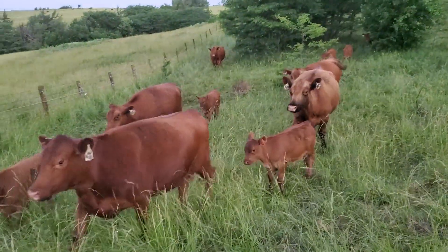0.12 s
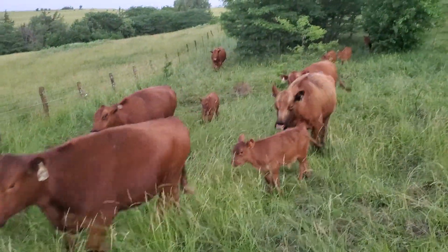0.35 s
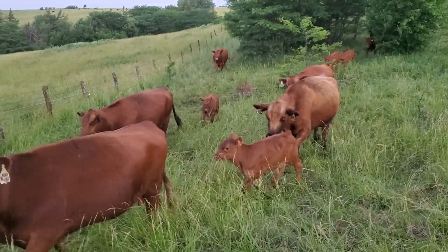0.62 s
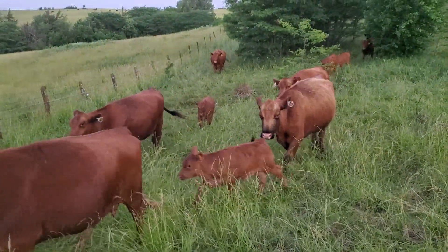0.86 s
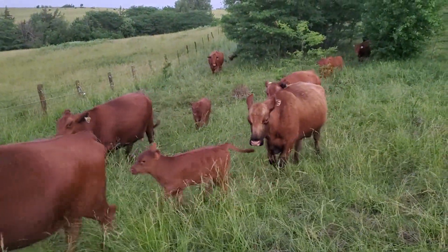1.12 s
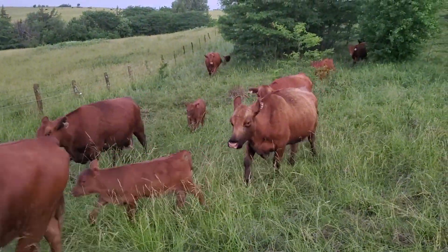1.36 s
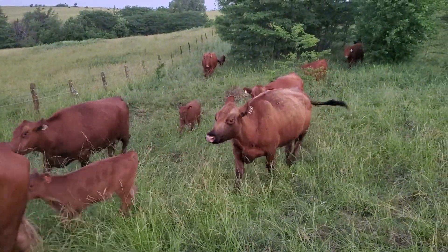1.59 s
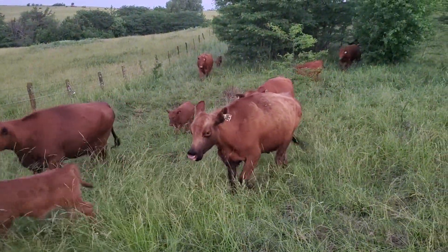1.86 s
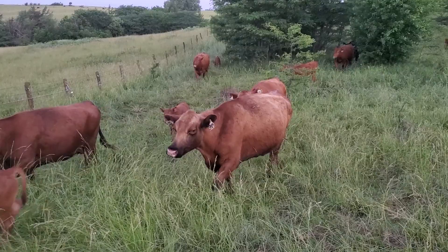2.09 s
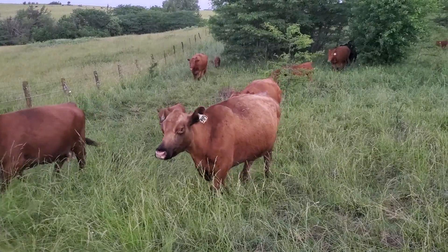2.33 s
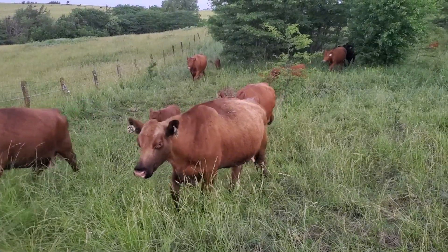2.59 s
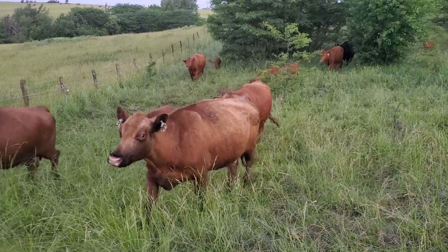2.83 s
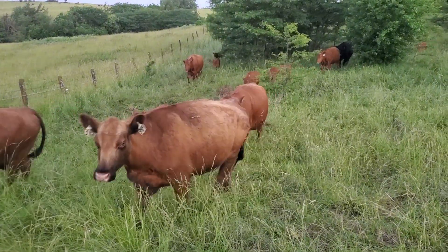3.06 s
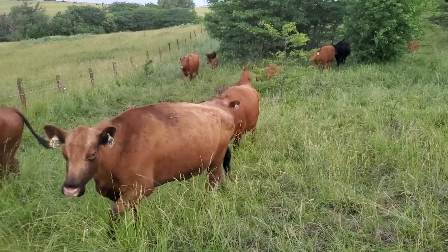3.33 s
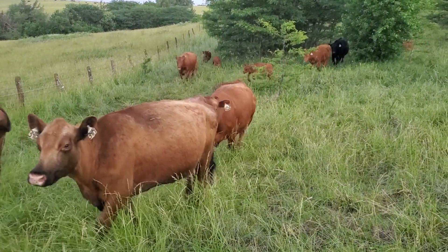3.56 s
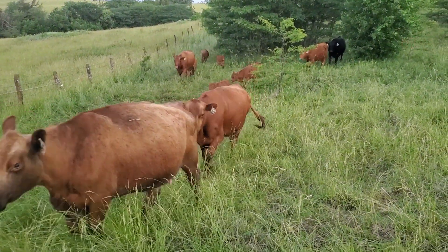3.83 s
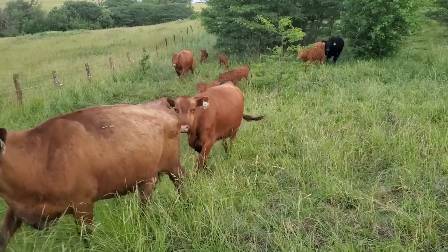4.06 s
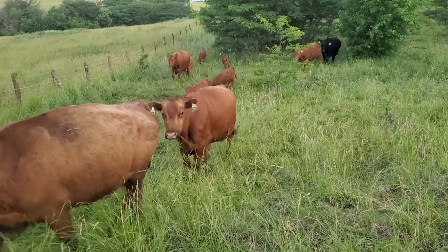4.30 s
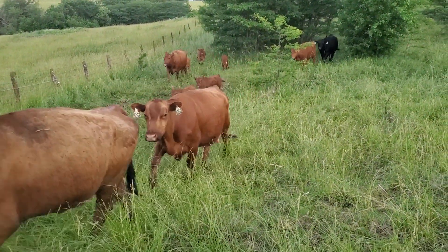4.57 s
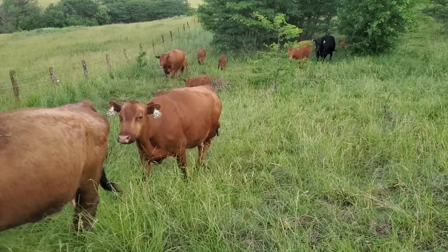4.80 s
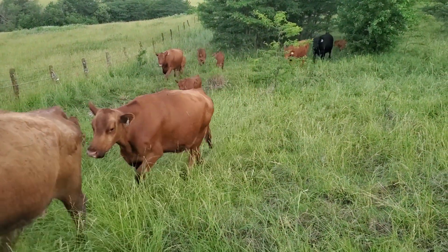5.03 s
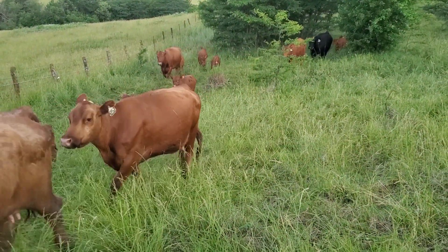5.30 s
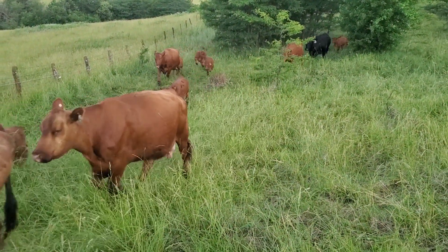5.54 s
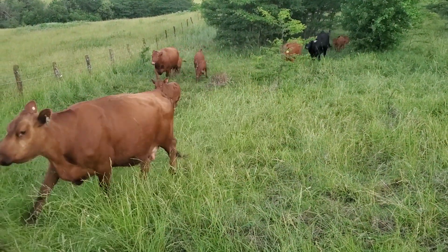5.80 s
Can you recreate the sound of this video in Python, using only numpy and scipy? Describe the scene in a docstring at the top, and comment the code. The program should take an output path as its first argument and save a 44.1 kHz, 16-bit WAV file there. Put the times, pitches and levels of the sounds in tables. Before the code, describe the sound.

A faint low grunt opens the scene over brushing grass and regular little bird chirps. One cow's moo swells from a nasal murmur to a strong, resonant call mid-scene, then cuts off quickly with a slight outdoor echo. Another muted grunt overlaps its end. Legs keep sweeping through grass, with sharp stem snaps, soft footfalls and a last tiny grunt. Handheld stereo pickup, open field, gentle wind buffeting.

```python
"""Cow mooing in a pasture

A cow walking through tall grass moos once: harmonics through a vocal tract, a closed-mouth hum that rises
in pitch and opens into a bright call. Others grunt softly in a few low overtones. Shaped noise makes the
swish of the herd's legs in the grass and the light breeze rumbling in the two microphone ports. Hooves thud
as damped sines, stems snap as short rings with crumble, and small birds in the hedge chirp as sliding sines."""
import sys
import numpy as np
from scipy import signal
from scipy.fft import irfft
from scipy.io import wavfile
from scipy.ndimage import uniform_filter1d

SR = 44100
rng = np.random.default_rng(int(sys.argv[2]) if len(sys.argv) > 2 else 0)


def store_wav(level_fs):
    """Save 16-bit WAV to argv[1]."""
    pcm = np.round(np.clip(np.atleast_2d(level_fs), -1, 1) * 32767)
    wavfile.write(sys.argv[1], SR, pcm.T.astype(np.int16))


def ratio(d):
    """dB to gain"""
    e = np.asarray(d, float) / 20
    return 10 ** e


N = 260631


def evened(x):
    """Scales to rms 1."""
    return x / np.sqrt(np.mean(x ** 2) + 1e-20)


def read(points, hz):
    """Reads a spectrum on a log-frequency axis."""
    f, value = np.transpose(points)
    return np.interp(np.log(hz + 1), np.log(f + 1), value)


def add(mix, start_s, sound, pan_db=0):
    """Places a sound between the two channels; positive pan leans left."""
    part = mix[:, round(start_s * SR):][:, :len(sound)]
    part += ratio(np.array([[pan_db / 2], [-pan_db / 2]])) * sound[:part.shape[1]]


def noise(spectrum, s, db, size, same, lead_s, lean_db, patchy_db, flicker_db):
    """Random short-time spectra with drifting patches and wide flicker; the left port may hear it first."""
    hop = size // 4
    frames, hz = N // hop + 5, np.fft.rfftfreq(size, 1 / SR)
    a, b, c, d, patches = rng.standard_normal((frames, len(hz), 5)).T
    patches = uniform_filter1d(patches, size=len(hz) // 20 + 1, axis=0)
    patches = evened(uniform_filter1d(patches, size=5, axis=1))
    flicker = evened(uniform_filter1d(rng.standard_normal(frames), size=3))

    same = np.clip(same, -1, 1)  # correlation between the ports
    left = a + 1j * b
    delay = np.exp(-2j * np.pi * hz[:, None] * lead_s)
    right = same * left * delay + np.sqrt(1 - same ** 2) * (c + 1j * d)
    lean = ratio(lean_db * np.sqrt(hz / hz[-1]))[:, None]  # the ports differ most in the treble

    level_db = read(spectrum, hz)[:, None] + patchy_db * patches + flicker_db * flicker
    z = np.array([left * lean, right / lean]) * ratio(level_db)
    wave = signal.istft(z, nperseg=size, noverlap=size - hop)[1][:, :N]
    return evened(wave) * ratio(np.interp(np.arange(N) / SR, s, db))


# The swell, then the release. Each row: time in seconds, pitch in Hz, nose hum in dB, mouth call in dB.
MOO_COURSE = [(1.76, 73.58, -69, -62.5), (1.86, 75.43, -65, -74), (1.995, 81.3, -62.5, -83),
              (2.068, 92, -49.5, -64), (2.176, 104.7, -50, -56), (2.296, 131.9, -51, -46.5),
              (2.358, 141.3, -41.5, -44), (2.412, 149.6, -50.5, -44.5), (2.478, 158.8, -37, -40.5),
              (2.598, 168.2, -31.5, -36), (2.83, 175.6, -28, -37.5), (3.012, 176.2, -28.5, -36),
              (3.139, 173.9, -29, -35), (3.172, 154, -31, -34), (3.21, 130, -64, -66)]
# Throat and mouth, with the dips of the nasal side branch.
# Each row: frequency in Hz, gain half-open in dB, gain wide-open in dB.
VOCAL_TRACT = [(50, -23, -4), (178, 2, -2.5), (235, -2, -7), (318, -26, -27), (529, -19, -9.5),
               (692, -17, -25), (695, -27, -29.5), (824, -6.5, -6.5), (904, -15.5, -15),
               (1180, -10.5, -13.5), (1356, -10.5, -7.5), (1590, -31, -18.5), (1754, -10.5, -20),
               (2040, -29.5, -22), (2300, -21, -16.5), (2940, -43, -29.5), (4450, -63, -77)]


def moo(shimmer_db=2.3, breath_db=-24, echo_db=-15, ajar_hz=150, open_hz=175, closing_db=-60, lips_hz=1500):
    """Steady vocal pulses as harmonics through a causal tract; the mouth opens as the pitch climbs."""
    s, *columns = np.transpose(MOO_COURSE)
    t = np.arange(s[0], s[-1], 1 / SR)
    hz, hum_db, call_db = (np.interp(t, s, c) for c in columns)
    jitter = evened(uniform_filter1d(rng.standard_normal(len(t)), size=300))
    turns = np.cumsum(hz * (1 + 0.0017 * jitter)) / SR

    highest_hz = np.maximum.accumulate(hz)
    opening = np.clip((highest_hz - ajar_hz) / (open_hz - ajar_hz), 0, 1) ** 2
    sag = 1 - hz / highest_hz
    ajar, wide = np.array(VOCAL_TRACT)[:, [0, 1]], np.array(VOCAL_TRACT)[:, [0, 2]]
    grid_hz = np.fft.rfftfreq(8192, 1 / SR)
    log_gain = np.log(ratio(read(wide, grid_hz)))
    mirrored = np.r_[log_gain, log_gain[-2:0:-1]]
    phase = -signal.hilbert(mirrored).imag[:len(grid_hz)]  # minimum phase

    hum, call = np.zeros((2, len(t)))
    waver = rng.standard_normal((len(t), 45))
    waver = evened(uniform_filter1d(waver, size=1500, axis=0)).T  # each overtone drifts
    for k in range(1, 45):
        at_hz = k * hz
        tract_db = (1 - opening) * read(ajar, at_hz) + opening * read(wide, at_hz)
        level = np.sqrt(2) * ratio(tract_db + shimmer_db * np.tanh(k / 6) * waver[k])
        octaves = np.maximum(np.log2(at_hz / lips_hz), 0)
        level *= ratio(closing_db * sag * octaves)  # dB per octave, as the lips close
        partial = level * np.cos(2 * np.pi * k * turns + np.interp(at_hz, grid_hz, phase))
        nasal = np.clip((400 - at_hz) / 60, 0, 1)  # share that leaves through the nose
        hum += nasal * partial
        call += (1 - nasal) * partial
    hum = np.roll(hum, round(0.0016 * SR))  # the long nasal passage lags behind the mouth

    taps = irfft(np.exp(log_gain + 1j * phase) * (grid_hz > 400))[:2048]
    puffs = np.exp(-(turns % 1) / 0.3) * rng.standard_normal(len(t))  # air escaping at each opening
    breath = ratio(breath_db) * evened(signal.oaconvolve(puffs, taps)[:len(t)])
    strongest = call[call_db > call_db.max() - 5]
    voice = ratio(hum_db) * hum + ratio(call_db) * (call / strongest.std() + breath)
    voice *= signal.windows.tukey(len(t), 0.015)

    lag = np.arange(9000)
    field = rng.standard_normal((2, len(lag)))  # scatter off herd and hedge
    field *= ratio(-60 * lag / SR / 0.31) * (lag > 300)
    field = np.diff(field, prepend=0)  # bodies and leaves return mostly the upper voice
    field *= ratio(echo_db) / np.linalg.norm(field[0])
    field[0, 4] += ratio(-1.2)
    field[1, 0] += ratio(-1.6)  # the right port is a little nearer
    out = np.zeros((2, N))
    heard = signal.fftconvolve(voice[None], field, axes=1)
    out[:, round(s[0] * SR):][:, :heard.shape[1]] = heard
    return out


# Soft closed-mouth grunts from the herd.
# Each row: start in seconds, length in seconds, level in dB before the overtone gains, start and end pitch in Hz.
HERD_GRUNTS = [(0.0, 0.24, -55.5, 82.8, 72.5), (3.29, 0.37, -55.5, 86.1, 75.9), (5.82, 0.08, -52, 83.6, 75)]
# Grunt spectrum. Each row: multiple of the pitch, gain in dB.
HUM_OVERTONES = [(1, -0.5), (2, -4), (3, -7), (4, -14.5)]


def grunts(taper=0.54):
    """A few low overtones hummed through the nose, sinking in pitch."""
    out = np.zeros((2, N))
    for start_s, length_s, db, start_hz, end_hz in HERD_GRUNTS:
        turns = np.cumsum(np.linspace(start_hz, end_hz, round(length_s * SR))) / SR
        hum = sum(ratio(gain_db) * np.sin(2 * np.pi * round(k) * turns) for k, gain_db in HUM_OVERTONES)
        fade = signal.windows.tukey(len(turns), np.clip(taper, 0, 1))
        add(out, start_s, np.sqrt(2) * ratio(db) * fade * hum)
    return out


# Noise spectra of blade tips, stalks and trampled sward.
# Each row: frequency in Hz, relative density in dB per Hz.
BLADE_SPECTRUM = [(2650, -32), (4500, -11.5), (4920, -5), (7770, -9), (9210, -4), (10100, -9.5),
                  (12100, 2.5), (13900, -3), (16000, -6.5)]
STALK_SPECTRUM = [(710, -39), (1200, -8.5), (1850, 0), (2160, 0.5), (3140, -0.5), (4500, -2.5), (5850, -42),
                  (9900, -120)]
SWARD_SPECTRUM = [(82, -55), (140, 0.5), (309, -2), (383, -6), (606, -9), (725, -7), (1200, -12),
                  (1560, -7), (2640, -120)]
# Legs sweeping through the grass. Each row: middle in seconds, length in seconds (1/e width in power),
# swish in dB, stalks and sward in dB against the swish before their common offsets.
LEG_SWEEPS = [(0.09, 0.12, -51, 4, -2), (0.264, .24, -47.5, 0.5, 2), (0.592, 0.073, -48, -4.5, -5.5),
              (0.773, 0.21, -51, -1.5, -2), (1.087, 0.12, -48.5, -1, -3), (1.295, .17, -46, -3, -1.5),
              (1.671, 0.2, -45.5, -1.5, -3), (1.817, 0.039, -43, -5.5, -2), (1.903, 0.067, -49, -1, -2),
              (2.14, 0.14, -46.5, 0.5, -1.5), (2.344, 0.13, -44, 2, -2.5), (2.538, 0.28, -52, 2, 5.5),
              (2.728, .12, -47, -0.5, 1), (2.943, 0.26, -43.5, -1.5, 0), (3.206, 0.12, -47, 3, 1.5),
              (3.448, 0.19, -45.5, 0.5, 0.5), (3.7, 0.15, -50, 2.5, -0.5), (3.858, .16, -51, 3.5, 1),
              (4.076, 0.22, -45.5, 1.5, -3), (4.317, 0.17, -47.5, -1.5, 0), (4.558, 0.13, -46.5, 2.5, -0.5),
              (4.713, 0.12, -47.5, -1, -2.5), (5.024, 0.4, -48.5, 1, -3.5), (5.367, 0.11, -50, 1.5, 3),
              (5.515, 0.089, -46.5, -2.5, -3), (5.73, 0.38, -51.5, 2, -1), (5.896, .08, -50.5, 1.5, 1)]


def grass(still_db=-53, squareness=2.17, brush_offset_db=-8, trample_offset_db=-8):
    """Blade tips hiss and stalks brush legs with fine crackle; the trampled sward gives a duller crush."""
    s = np.arange(0, N / SR, 0.005)
    middle_s, length_s, db, stalks_db, sward_db = np.transpose(LEG_SWEEPS)[:, :, None]
    sweeps = ratio(db) ** 2 * np.exp(-abs(2 * (s - middle_s) / length_s) ** squareness)

    def course_db(more_db):
        """Sums sweep powers over the far herd's steady floor."""
        return 10 * np.log10(ratio(still_db) ** 2 + (sweeps * ratio(more_db) ** 2).sum(0))

    swish = noise(BLADE_SPECTRUM, s, course_db(0), size=512, same=0.19, lead_s=0.000291,
                  lean_db=2.0, patchy_db=1.5, flicker_db=1.14)
    brush = noise(STALK_SPECTRUM, s, course_db(stalks_db) + brush_offset_db, size=512, same=0.062,
                  lead_s=0.00048, lean_db=1.5, patchy_db=2.0, flicker_db=0.46)
    trample = noise(SWARD_SPECTRUM, s, course_db(sward_db) + trample_offset_db, size=1024, same=0.83,
                    lead_s=0.00028, lean_db=-3.5, patchy_db=1.5, flicker_db=1.5)

    ticks = ratio(5.6 * np.minimum(rng.exponential(1, (N, 2)).T, 5))
    ticks *= rng.random((N, 2)).T < 250 / SR  # 250 per second on average
    decay = np.exp(-np.arange(200) / 40)
    crackle = 1 + 0.15 * signal.oaconvolve(ticks, decay[None])[:, :N]
    return (swish + brush) * evened(crackle) + trample


# Footfalls. Each row: start in seconds, envelope peak in dB, ring in Hz.
HOOF_THUDS = [(0.265, -43.5, 61.3), (1.063, -43, 67), (1.287, -43.5, 56), (1.79, -46.5, 70),
              (2.329, -55, 117), (2.543, -44, 74), (2.889, -48, 116.5), (3.009, -57, 57.02),
              (4.152, -38, 59), (4.235, -46, 64.6), (5.126, -54, 81)]


def hooves(decay_s=0.013):
    """Each footfall is a soft push of turf that rings for a cycle or two."""
    out, t = np.zeros((2, N)), np.arange(5000) / SR
    for start_s, db, hz in HOOF_THUDS:
        push = t / decay_s * np.exp(1 - t / decay_s)
        add(out, start_s, ratio(db) * push * np.sin(2 * np.pi * hz * t))
    return out


# Stems breaking. Each row: start in seconds, ring peak in dB, pitch in Hz, ring time in cycles,
# crumble in dB against the ring.
STEM_SNAPS = [(.217, -32.5, 9100, 0.35, -7), (0.346, -31.5, 1210, 0.31, -11.5), (.35, -42, 700, 0.73, -20),
              (0.3654, -38, 694, 0.42, -6), (0.429, -41.5, 1200, 0.28, -12), (.757, -44.5, 746, 2.5, -2),
              (0.883, -30.5, 5640, 2.5, -13), (.939, -40.5, 1530, 0.32, -15), (1.92, -43.5, 2190, 0.63, -8),
              (2.544, -37.5, 850, 4.5, -21), (3.4976, -24.5, 2190, 1.5, -25), (4.223, -44, 2100, 0.75, -1),
              (5.1, -39, 4450, 9, -18), (5.22, -40, 9000, 0.36, -6), (5.5182, -27.5, 6440, 0.47, -11)]


def stems(overtone=1.81, overtone_db=-3, rise=0.17, low_cut=0.55, crumble_s=0.0024, pan_db=0.5):
    """A snap at the stem's own pitch with one overtone, then a short crumble."""
    out, t = np.zeros((2, N)), np.arange(900) / SR
    dusts = rng.standard_normal((len(STEM_SNAPS), len(t)))
    for (start_s, db, hz, cycles, crumble_db), dust in zip(STEM_SNAPS, dusts):
        age = t * hz / cycles  # in ring times
        tone = np.sin(2 * np.pi * hz * t) + ratio(overtone_db) * np.cos(2 * np.pi * overtone * hz * t)
        ring = np.tanh(age / rise) * np.exp(-age) * tone
        high_pass = signal.butter(4, low_cut * hz, "high", fs=SR)
        ring = signal.lfilter(*high_pass, ring)  # a thin stem sends out no bass
        crumble = signal.fftconvolve(dust * np.exp(-t / crumble_s), ring)[:len(t)] / np.linalg.norm(ring)
        add(out, start_s, ratio(db) * (ratio(crumble_db) * crumble - ring / abs(ring).max()), pan_db)
    return out


# Bird calls. Each row: start in seconds, peak in dB before flutter, kind of note.
BIRD_CHIRPS = [(0.148, -53.5, "low"), (.355, -51, "low"), (.553, -53, "low"), (.752, -52.5, "low"),
               (.955, -59, "low"), (1.158, -58, "low"), (1.391, -55.5, "rise"), (1.445, -58, "blip"),
               (1.482, -56.5, "mid"), (2.207, -57, "high"), (2.445, -52, "mid"), (2.466, -48, "short"),
               (2.562, -57, "mid"), (3.537, -57, "high"), (3.67, -49.5, "high"), (3.811, -52.5, "high"),
               (4.056, -48, "drop"), (4.868, -60, "mid"), (4.987, -57, "mid"), (5.108, -53, "mid"),
               (5.245, -61.5, "flat"), (5.29, -61, "flatter"), (5.635, -54.5, "mid"), (5.748, -52.5, "mid"),
               (5.864, -54.5, "mid")]
# Kinds of note by name. Each entry: start in Hz, end in Hz, length in seconds.
BIRD_NOTES = {"low": (3600, 2980, .042), "mid": (4050, 3500, .025), "high": (4700, 3800, .033),
              "drop": (3300, 2200, .015), "short": (3180, 2900, .022), "rise": (3800, 4200, .028),
              "flat": (2820, 2700, .09), "flatter": (2550, 2490, .13), "blip": (2250, 2150, .03)}


def birds(bend=1.5, flutter_db=2.5):
    """Near-sine whistles that slide fast, then level out, fluttering on their way through the leaves."""
    out = np.zeros((2, N))
    flutter = flutter_db * evened(uniform_filter1d(rng.standard_normal(N), size=250))
    for start_s, db, kind in BIRD_CHIRPS:
        start_hz, end_hz, length_s = BIRD_NOTES[kind]
        u = np.linspace(0, 1, round(length_s * SR))
        hz = end_hz + (start_hz - end_hz) * (1 - u) ** bend
        add(out, start_s, ratio(db) * np.sin(np.pi * u) * np.sin(2 * np.pi * np.cumsum(hz) / SR))
    return out * ratio(flutter)


# Breeze at the ports. Each row: time in seconds, left port in dB, right port in dB.
BREEZE_COURSE = [(0, -61, -56.5), (.33, -50.5, -50), (.41, -76, -54), (.62, -80, -61), (.8, -53, -57),
                 (.95, -81, -56), (1.1, -58, -48), (1.33, -52, -54.5), (1.5, -68, -52), (1.62, -55, -56),
                 (1.75, -76, -54), (1.95, -81, -52), (2.05, -59, -48), (2.42, -60, -52), (2.6, -37, -47),
                 (2.9, -50, -55), (3.05, -46, -53), (3.25, -54, -53), (3.5, -56.5, -52), (3.8, -62, -52.5),
                 (3.97, -51, -45.5), (4.06, -60, -52), (4.2, -51, -49.5), (4.38, -55, -58),
                 (4.87, -76, -57), (5.05, -55.5, -52.5), (5.4, -61, -58.5), (5.5, -82, -56),
                 (5.6, -62, -55), (5.78, -61, -54), (5.91, -51, -49)]
# Rumble spectrum. Each row: frequency in Hz, relative density in dB per Hz.
RUMBLE_SPECTRUM = [(12, -42), (20, -25), (41, -2), (59, 0), (79, 2.5), (150, -16), (200, -41), (330, -120)]


def breeze():
    """Lumpy low rumble, mostly unrelated between the ports; gusts strike one side or the other."""
    s, *ports_db = np.transpose(BREEZE_COURSE)
    rumble = noise(RUMBLE_SPECTRUM, [0], [0], size=2048, same=0.36, lead_s=0,
                   lean_db=-5, patchy_db=2.0, flicker_db=0.5)
    return rumble * ratio(np.array([np.interp(np.arange(N) / SR, s, db) for db in ports_db]))


def scene():
    """Everything at the two ports."""
    return moo() + grunts() + grass() + hooves() + stems() + birds() + breeze()


def band_limit(x):
    """A steep low-pass at the top of the band."""
    return signal.sosfilt(signal.butter(12, 15900, fs=SR, output="sos"), x)


def record(dry):
    """Returns the finished mix as stored."""
    return band_limit(dry)


dry = scene()
out = record(dry)
store_wav(out)
```